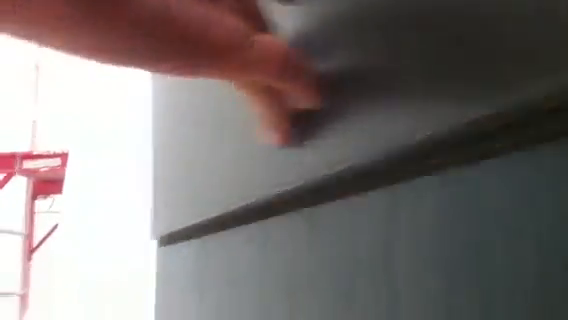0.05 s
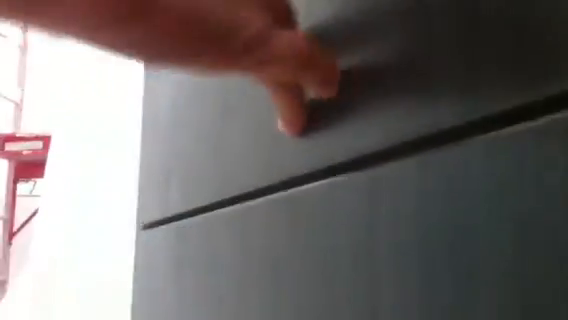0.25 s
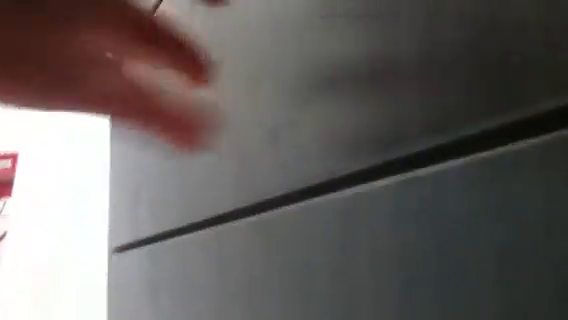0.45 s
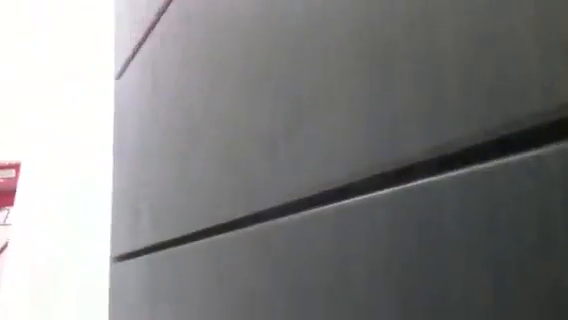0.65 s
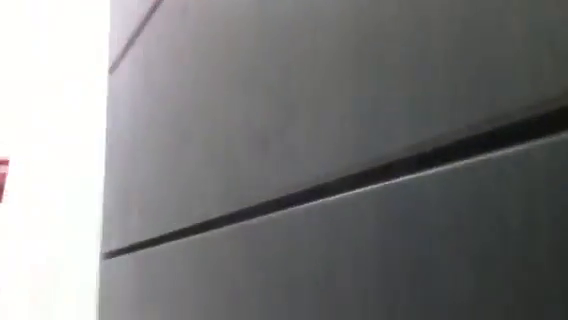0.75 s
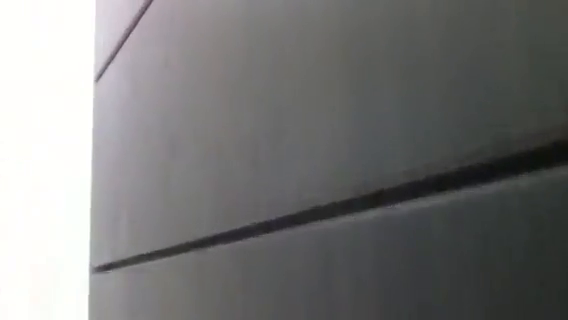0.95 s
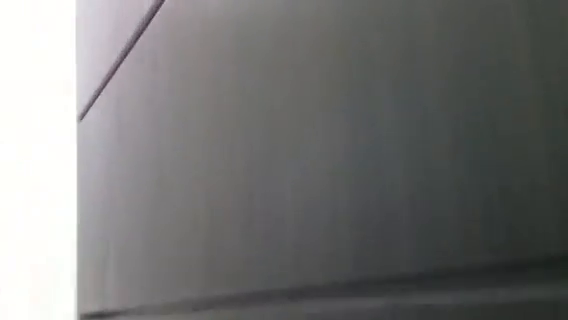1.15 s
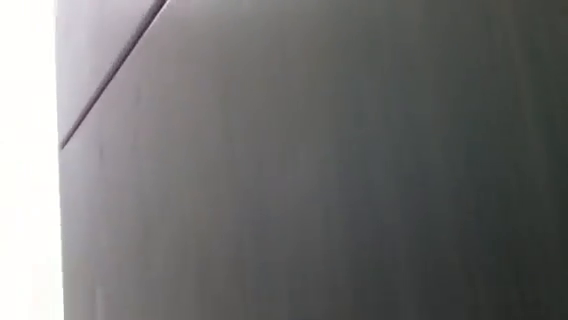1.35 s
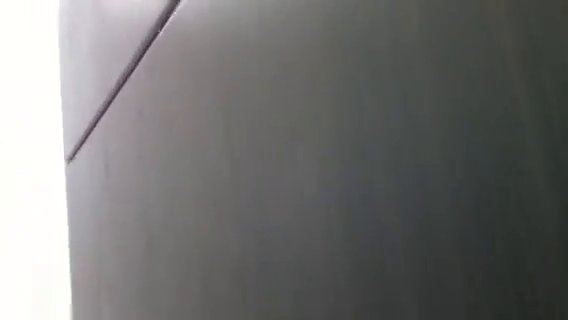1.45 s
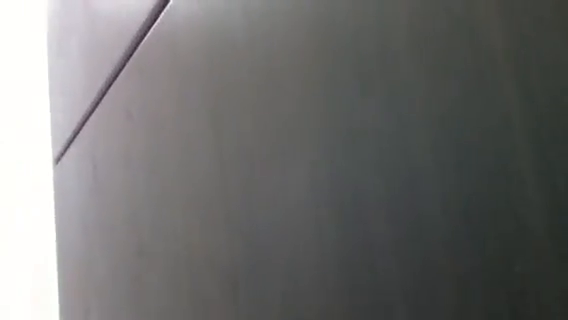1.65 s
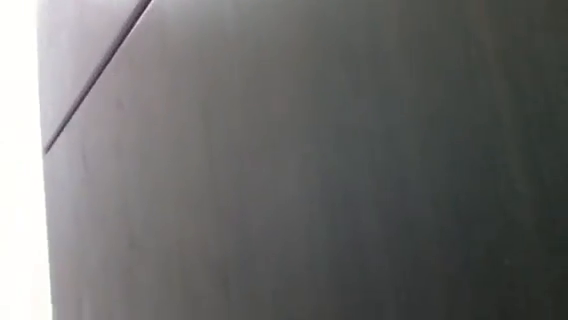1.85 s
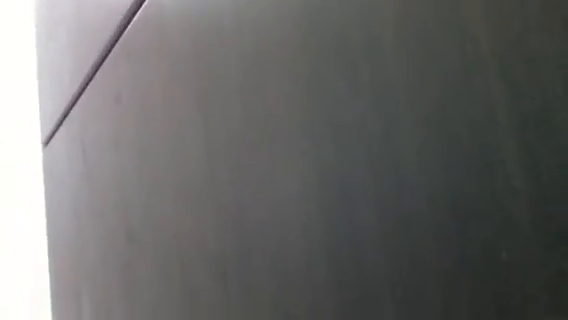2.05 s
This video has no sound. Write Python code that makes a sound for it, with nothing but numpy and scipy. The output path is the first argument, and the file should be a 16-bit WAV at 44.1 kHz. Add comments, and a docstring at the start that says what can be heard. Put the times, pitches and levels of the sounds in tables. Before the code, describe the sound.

A drawer is pushed shut close by, one short clattering thud over faint hiss.

```python
"""Faint hiss, then a drawer slides shut close to the microphone, slams home and rattles briefly. Its front
strikes the cabinet several times, ringing the panels, and the catch snaps in. The small bare room booms and
rings on; later a few soft knocks sound further off. The hiss swells and fades over low room tone, with a faint
dull rustle at the end. Mono."""
import sys
import numpy as np
from scipy import signal
from scipy.fft import rfft, irfft, next_fast_len
from scipy.io import wavfile

SR = 44100
rng = np.random.default_rng(int(sys.argv[2]) if len(sys.argv) > 2 else 0)


def wav_out(sig):
    """Save sig, one row per channel (or a flat mono array), as 16-bit PCM at SR to the path in sys.argv[1]."""
    wavfile.write(sys.argv[1], SR, np.round(np.clip(np.atleast_2d(sig).T, -1, 1) * 32767).astype(np.int16))


N = 92610

# drawer front meeting the cabinet: start_s, level_db, brightness_hz
FRONT_CONTACTS = [(0.2341, 0, 1140), (.2376, -2, 990), (.2463, -4.5, 3000), (0.2482, -0.5, 1010),
                  (0.258, -8, 2150), (.2655, -10.5, 1310), (0.2713, -12.5, 1020)]
# modes of drawer and cabinet panels: pitch_hz, level_db, t60_s
PANEL_MODES = [(199, -31, 0.095), (267, -34.5, 0.31), (372, -31, .14), (489, -31, .11), (574, -30, 0.1),
               (656, -24, 0.095), (780, -23, 0.2), (853, -21, .12), (911, -26.5, 0.24), (1008, -42, 0.2),
               (1213, -23, 0.11), (1380, -29, 0.14), (1496, -26.5, 0.16), (2210, -25, 0.092)]
# dense high modes of box and runners: frequency_hz, level_db
CLATTER_SPECTRUM = [(60, 0.5), (200, -5), (600, -1.5), (1400, 1), (2600, 0.5), (5000, -10.5), (9000, -5.5),
                    (16000, -42)]
# their decay: frequency_hz, t60_s
CLATTER_DECAY = [(200, .06), (1500, .045), (4000, .04), (10000, .035)]
# rush of the runners: frequency_hz, level_db
SLIDE_SPECTRUM = [(100, -5), (500, -0.5), (1500, 4), (4000, -3.5), (16000, -23)]
# snap of the catch: frequency_hz, level_db
CATCH_SPECTRUM = [(300, -27), (1200, 4), (2500, -3), (4200, 5), (6000, -21), (16000, -26)]
# low standing waves of the room: pitch_hz, level_db, t60_s
STANDING_WAVES = [(109.3, -22, 0.44), (93.2, -35, 0.71), (194.5, -26.5, 0.48), (184, -36, 1.3)]
# reverberation of the bare room: frequency_hz, level_db
ROOM_SPECTRUM = [(40, -26), (90, -7), (190, 0), (280, -4.5), (500, 2.5), (900, -2), (1500, -5.5),
                 (2500, -6.5), (8000, -9.5)]
# its decay: frequency_hz, t60_s
ROOM_DECAY = [(100, 1), (500, 0.69), (1500, 0.97), (3000, 0.56), (8000, 0.45)]
# knocks further off: start_s, level_db
FAR_KNOCKS = [(1.08, -49), (1.792, -31), (1.824, -39), (2.04, -44)]
# modes of the knocked body: pitch_hz, level_db, t60_s
FAR_KNOCK_MODES = [(323, -6, 0.073), (450, -6, .04), (575, 5.5, .045), (617, -7.5, .035)]
# course of the hiss up to and around the slam: time_s, treble_db, top_db
HISS_AROUND_SLAM = [(0, -45, -50), (.1, -42.5, -43.5), (.2, -41, -38), (.25, -37, -37), (.28, -42, -60),
                    (.335, -54, -59)]
# its course afterwards: time_s, treble_db, top_db
HISS_AFTER_SLAM = [(0.39, -47.5, -46.5), (0.47, -46, -42), (0.628, -44, -41), (0.752, -49.5, -52),
                   (1.008, -44, -39), (1.108, -47, -49.5), (1.16, -43.5, -42), (1.27, -42.5, -36.5),
                   (1.414, -42.5, -40), (1.494, -46, -53.5), (1.566, -46.5, -47), (1.694, -38.5, -40.5),
                   (1.752, -39.5, -43), (1.852, -46.5, -54), (1.894, -44, -43.5), (1.96, -40.5, -37.5),
                   (2.094, -41, -37.5), (2.1, -41, -34)]
# treble band of the hiss: frequency_hz, level_db
TREBLE_SPECTRUM = [(300, -32), (900, -18), (1800, -6.5), (3000, -1.5), (4500, 1.5), (7000, -0.5),
                   (9500, -3), (12000, -10.5), (16000, -16)]
# top octave of the hiss: frequency_hz, level_db
TOP_SPECTRUM = [(2000, -52), (5000, -18), (8000, -2), (10000, -1.5), (12500, 0.5), (16000, -2)]
# low room tone: frequency_hz, level_db
TONE_SPECTRUM = [(25, -22), (60, -28), (105, -5.5), (150, -5), (190, 2), (250, -3.5), (400, -3.5),
                 (700, -11.5), (1500, -15), (5000, -21.5)]
# its slow rise and fall: time_s, level_db
TONE_LEVELS = [(0, -49), (.3, -44.5), (.9, -52), (1.7, -53), (2.1, -49.5)]
# dull rustle: frequency_hz, level_db
RUSTLE_SPECTRUM = [(150, -16), (450, -2), (720, 5), (1100, -4), (2000, -30), (5000, -38)]


def drawer():
    """Close up, each contact shoves the front, rattles the box and rings the panels."""
    shove = ring([(733, -3.5, 0.0069)])  # pitch_hz, level_db, t60_s
    panel = ring(PANEL_MODES, wander_rad=0.78)
    blows = runners() + catch()
    ringing = np.zeros(N)
    for contact in FRONT_CONTACTS:
        clatter = amp(12.5) * dense_ring(CLATTER_SPECTRUM, CLATTER_DECAY, attack_s=0.00065)
        blows += strike(shove + clatter, *contact)
        ringing += strike(panel, *contact)
    into_room = blows + amp(-13) * ringing  # the room answers mostly the blows
    return blows + ringing + amp(-14) * room(into_room)


def runners(rise_s=0.014, stop_s=0.0026):
    """The runners rush up to the first contact and stop short."""
    until_contact_s = FRONT_CONTACTS[0][0] - seconds()
    envelope = np.exp(-np.maximum(until_contact_s / rise_s, -until_contact_s / stop_s))
    return amp(-30) * noise(SLIDE_SPECTRUM) * envelope


def catch(start_s=0.2465):
    """The catch snaps in with a tiny burst of bright noise."""
    age_s = seconds() - start_s
    envelope = (age_s > 0) * decay(np.abs(age_s), t60_s=0.0064)
    return amp(-15) * noise(CATCH_SPECTRUM) * envelope


def boom():
    """The slam sets off the room's standing waves, which build up and beat as they fade."""
    waves = ring(STANDING_WAVES, wander_rad=0.59) * rise(0.016)
    return strike(waves, start_s=0.238, level_db=0, brightness_hz=2000)


def room(sound):
    """The small bare room's reverberation, as it reaches the microphone."""
    response = dense_ring(ROOM_SPECTRUM, ROOM_DECAY, attack_s=0.006)
    return signal.fftconvolve(sound, response)[:N]


def knocks():
    """Dull knocks further off, with the room's answer; each knock comes in softly."""
    direct = np.zeros(N)
    for start_s, level_db in FAR_KNOCKS:
        body = ring(FAR_KNOCK_MODES, wander_rad=0.78) * rise(0.004)
        direct += strike(body, start_s, level_db, brightness_hz=616)
    return direct + amp(-7) * room(direct)


def hiss():
    """Broad hiss swells and fades, its top octave swinging furthest."""
    time_s, treble_db, top_db = np.transpose(list(HISS_AROUND_SLAM) + list(HISS_AFTER_SLAM))
    treble = amp(np.interp(seconds(), time_s, treble_db) + 0.5) * noise(TREBLE_SPECTRUM)
    top = amp(np.interp(seconds(), time_s, top_db) + 1) * noise(TOP_SPECTRUM)
    return treble + top


def rustle():
    """A faint dull rustle comes in near the end."""
    return amp(-53) * rise(0.02, start_s=1.896) * noise(RUSTLE_SPECTRUM)


def room_tone():
    """The room's low background noise, drifting slowly in level."""
    level_db = np.interp(seconds(), *np.transpose(TONE_LEVELS))
    return amp(level_db) * noise(TONE_SPECTRUM)


def strike(body, start_s, level_db, brightness_hz):
    """A body's ringing, delayed to the contact; a softer contact is duller."""
    def response(hz):
        return np.exp(-2j * np.pi * hz * start_s) / (1 + 1j * hz / brightness_hz)
    return amp(level_db) * filtered(body, response)


def ring(modes, wander_rad=0, wander_per_s=42):
    """Damped sines from time zero; their phases may drift at random, as loose joints make them do."""
    t = seconds()
    sound = np.zeros(N)
    for pitch_hz, level_db, t60_s in modes:
        knots = rng.standard_normal(int(N / SR * wander_per_s) + 2)
        drift = np.interp(t * wander_per_s, np.arange(len(knots)), knots - knots[0])
        wander = wander_rad * drift * rise(t60_s / 2)
        sound += amp(level_db) * decay(t, t60_s) * np.sin(2 * np.pi * pitch_hz * t + wander)
    return sound


def dense_ring(spectrum, t60s, attack_s):
    """Dense ringing of energy 1; each frequency dies at its own speed."""
    hz, t, bands = signal.stft(noise(spectrum), SR, nperseg=256)
    bands *= decay(t, along(t60s, hz)[:, None])
    sound = signal.istft(bands, SR, nperseg=256)[1][:N] * rise(attack_s)
    return sound / np.linalg.norm(sound)


def noise(spectrum):
    """Coloured noise of rms 1."""
    coloured = filtered(rng.standard_normal(N), lambda hz: amp(along(spectrum, hz)))
    return coloured / np.sqrt(np.mean(coloured ** 2) + 1e-20)


def filtered(sound, response):
    """A sound shaped by a response of frequency."""
    size = next_fast_len(N + SR // 2)
    hz = np.fft.rfftfreq(size, 1 / SR)
    return irfft(rfft(sound, size) * response(hz), size)[..., :N]


def along(points, hz):
    """Interpolate (frequency_hz, value) points on a log frequency axis."""
    point_hz, values = np.transpose(points)
    return np.interp(np.log(hz + 1), np.log(point_hz + 1), values)


def rise(attack_s, start_s=0):
    """An exponential climb from 0 towards 1."""
    return 1 - np.exp(-np.maximum(seconds() - start_s, 0) / attack_s)


def decay(age_s, t60_s):
    """A fall of 60 dB every t60_s."""
    return np.exp(-np.log(1000) * age_s / t60_s)


def seconds():
    """The time of each sample."""
    return np.arange(N) / SR


def amp(db):
    """Decibels to gain."""
    return 10 ** (np.asarray(db) / 20)


def scene():
    """Near drawer and far knocks over hiss and room tone, the same in both channels."""
    mono = drawer() + boom() + knocks() + hiss() + rustle() + room_tone()
    return np.array([mono, mono])


def record(dry):
    """The microphone drops the deep bass and keeps nothing above its band limit."""
    low_cut_hz, band_limit_hz = 85, 16050
    low_cut = signal.butter(3, low_cut_hz, "highpass", fs=SR, output="sos")
    return filtered(signal.sosfilt(low_cut, dry), lambda hz: hz < band_limit_hz)


dry = scene()
out = record(dry)
wav_out(out)
```